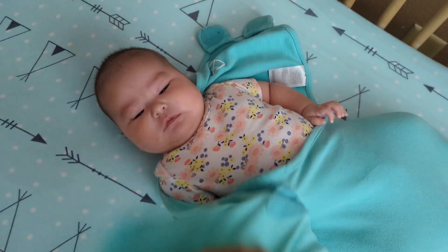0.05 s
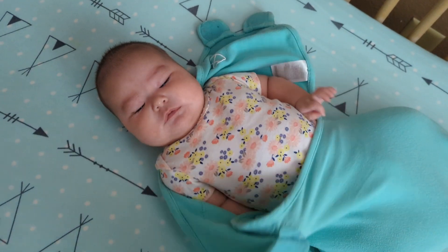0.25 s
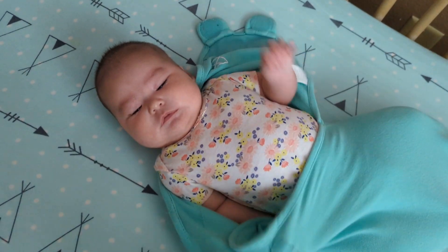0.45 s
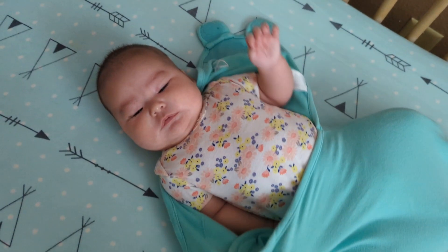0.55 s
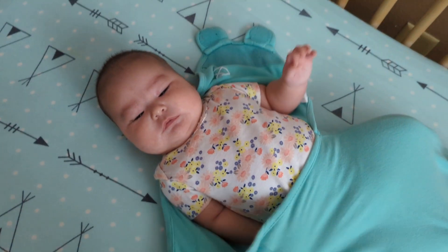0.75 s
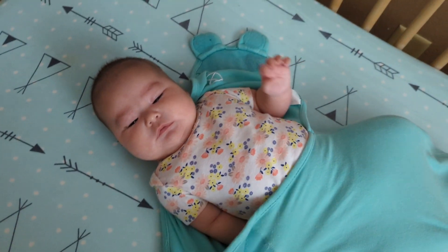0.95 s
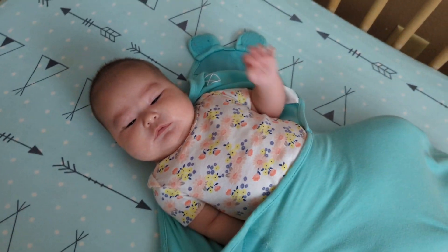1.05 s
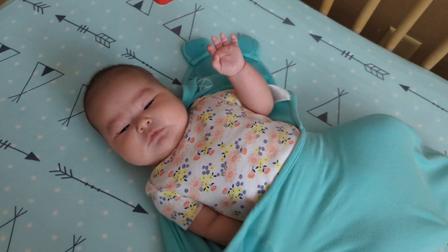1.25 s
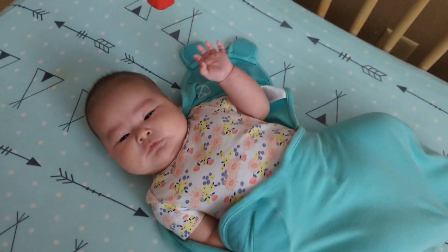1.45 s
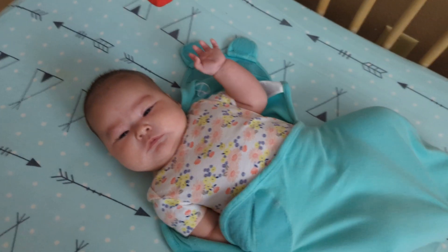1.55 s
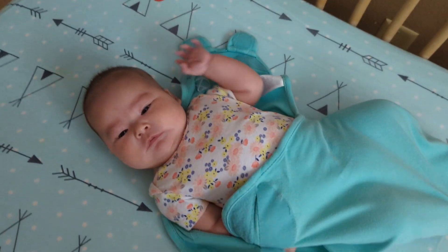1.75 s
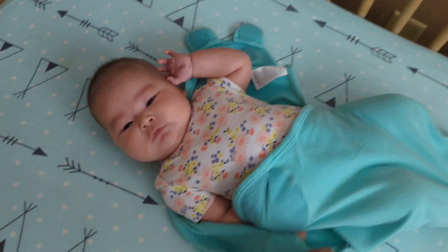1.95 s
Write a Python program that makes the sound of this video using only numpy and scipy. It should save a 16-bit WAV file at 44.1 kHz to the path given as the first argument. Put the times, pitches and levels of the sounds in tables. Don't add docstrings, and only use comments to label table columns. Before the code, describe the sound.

Crackling tear of a hook-and-loop fastener on soft cloth, ending with a short tug and wooden knock

```python
import sys
import numpy as np
from scipy import signal
from scipy.fft import rfft, irfft
from scipy.io import wavfile
from scipy.ndimage import uniform_filter1d

SR = 44100
rng = np.random.default_rng(int(sys.argv[2]) if len(sys.argv) > 2 else 0)


def unload_audio(sound):
    columns = np.transpose(np.atleast_2d(sound))
    steps = np.round(np.clip(columns, -1, 1) * 32767)
    wavfile.write(sys.argv[1], SR, steps.astype(np.int16))


def makeup_ratio(level_db):
    decades = np.asarray(level_db, float) / 20
    return 10 ** decades


N = 88200

# (time [s], hook level [dB], cloth level against hooks [dB])
FIRST_TUGS = [(0.0406, -20.5, -6), (0.0436, -16, -13), (0.0492, -36, -7.5), (0.0661, -19.5, -10.5),
              (0.0785, -34.5, 3), (0.0868, -24, -6), (0.0891, -27, -3), (0.0927, -22, -8.0),
              (0.0968, -28.5, -6), (0.1001, -28, 0.5), (0.1183, -43, 0), (0.1538, -42, -9.0),
              (0.1565, -29.5, -0.5), (0.1591, -33, -2.5), (0.1624, -32.5, -4), (0.1808, -40, -0.5),
              (0.1887, -21.5, -10.5), (0.1934, -32, -8.5), (0.1961, -24, -26), (0.2049, -40, 4),
              (0.2109, -38.5, -2.5), (0.2166, -28, -6.5), (0.219, -20, -9.5), (0.2247, -22.5, -4),
              (0.2285, -21.5, -9.5), (0.2619, -26, -4.5), (0.265, -36.5, -14.5), (0.284, -31, -9.5),
              (0.294, -24, -6.5), (0.3358, -27, -13.5)]
MIDDLE_RIP = [(0.3551, -26, -9.5), (0.358, -18, -9.0), (0.3622, -17.5, -11.5), (0.367, -23.5, -14),
              (0.3744, -21.5, -9.5), (0.3794, -24, -4.5), (0.3852, -24.0, -14.5), (0.3884, -16.5, -14.5),
              (0.3943, -23, -11.5), (0.3983, -21.5, -13.0), (0.4018, -13.5, -8.5), (0.412, -18, -13.5),
              (0.4172, -23, -13.5), (0.4211, -22.5, -8.5), (0.4245, -10, -14.5), (0.4302, -16.5, -13),
              (0.4326, -16, -12), (0.4362, -24.5, -10.5), (0.4393, -21.5, -13), (0.4448, -19, -13.5),
              (0.4504, -14, -11.5), (0.4552, -21, -14), (0.4636, -29.5, -13), (0.4732, -23, -18),
              (0.4788, -12, -14), (0.4827, -24, -13.5), (0.4878, -20.5, -12), (0.4993, -17.5, -10),
              (0.5024, -24, -10.5), (0.5109, -23, -11), (0.5138, -20, -9.5), (0.5173, -25.0, -14.0),
              (0.5217, -24.0, -21), (0.5266, -23.5, -18), (0.534, -24.5, -9.5), (0.5471, -29, -23),
              (0.5995, -24, -9), (0.6044, -24, -9.5), (0.6397, -26.5, -19.0), (0.6452, -27, -16.5),
              (0.6592, -31.5, -12.5), (0.664, -16.5, -4.5), (0.6678, -20, -13.5), (0.6722, -22, -14),
              (0.6772, -16, -19), (0.6806, -18, -12.5), (0.6899, -30.5, -12), (0.6941, -29, -8)]
LONG_RIP = [(0.713, -11, -13.5), (0.7225, -17, -17.5), (0.7252, -20, -10), (0.7289, -21, -12.5),
            (0.7319, -17, -13.0), (0.7345, -12.5, -12), (0.7405, -18, -11), (0.7448, -18, -17),
            (0.7519, -13.5, -10.5), (0.7591, -11.5, -12.5), (0.7652, -15, -10.5), (0.7703, -15.5, -8.5),
            (0.7745, -20.5, -14), (0.7788, -20, -14.0), (0.7827, -14.5, -13.5), (0.7853, -21, -12),
            (0.7878, -16.5, -8), (0.7917, -16.5, -17), (0.7941, -18.5, -12), (0.7966, -18.5, -14),
            (0.8025, -19.5, -12), (0.8069, -19, -15.5), (0.8116, -18, -19.5), (0.814, -22.0, -15),
            (0.8227, -20.5, -6), (0.8259, -12, -13), (0.8285, -16.5, -16.5), (0.8311, -20.0, -14),
            (0.8353, -14.5, -17), (0.8391, -23, -16), (0.8444, -20.5, -20), (0.8489, -19, -13),
            (0.8516, -22, -11), (0.8577, -22.5, -16.5), (0.8608, -21.5, -18.5), (0.8661, -26.5, -12.5),
            (0.871, -19.5, -14.5), (0.8758, -16.5, -14.5), (0.8848, -12, -11.5), (0.8939, -12, -12),
            (0.9006, -22, -12), (0.9083, -22.5, -13.5), (0.9129, -14, -7), (0.9166, -17.5, -8.5),
            (0.9303, -26.5, -12.5), (0.9357, -23.5, -13.5), (0.9402, -26, -8), (0.9498, -15.5, -9.5),
            (0.955, -28, -11.0), (0.9578, -25, -7)]
LAST_TUG = [(1.2903, -19.5, -7), (1.2953, -34.5, -12), (1.2998, -16, -18.5), (1.3081, -13, -15),
            (1.3206, -30.5, -13.5), (1.326, -40.5, -8), (1.3299, -41, -4), (1.3326, -33.5, -5),
            (1.3401, -25.5, -15), (1.3427, -38, -4.5), (1.3475, -29, -12), (1.3527, -42, -1)]
STRAY_ROWS = [(0.039, -22.5, -14), (.707, -35, -11), (.8825, -12, -11), (.921, -21.5, -9),
              (1.001, -42, -9.5), (1.2978, -21, -7), (1.313, -24.5, -5.5)]
# (time [s], level [dB])
PEEL = [(.347, -67), (.356, -30.5), (.46, -37), (.535, -40), (.56, -73), (.645, -62.5), (.66, -29),
        (.7, -45.5), (.712, -27.5), (.9, -32), (.955, -38), (.975, -65), (1.28, -77), (1.3, -31),
        (1.345, -50), (1.5, -62), (1.6, -84)]
# (time [s], middle band level [dB], top band level [dB])
HOOK_THINNING = [(0, -10, -5.5), (.3, 0.5, 1), (.4, 2.5, 3.5), (0.698, 0, 2), (.82, 4, -0.5),
                 (1.299, 0.5, -4)]
HOOK_BAND_EDGES = [8000, 12500]
# (frequency [Hz], width [Hz], level [dB])
HOOK_PEAKS = [(5565, 1370, 8), (9885, 1200, 8.5), (14760, 2260, 10.5)]
# (frequency [Hz], level [dB])
HOOK_TONE = [(300, -17.5), (1500, -11), (3200, -5.5), (8000, -4), (17000, -8)]
# (frequency [Hz], level [dB])
CLOTH_TONE = [(50, -37.5), (95, -12.5), (220, -14.5), (450, -11.5), (950, -10), (1150, -2.5), (2400, -2.5),
              (3600, -17.5)]
# (frequency [Hz], width [Hz], level [dB])
MATTRESS_PEAKS = [(122, 40, 7), (356.3, 54, 6.5), (1320, 150, 2.5)]
BODY_BAND = [150, 900]
# (frequency [Hz], correlation [0 to 1])
LIKENESS = [(60, 0.98), (400, 0.96), (560, 0.62), (1410, 0.54), (3100, 0.35), (6800, 0.33), (15000, 0.18)]
# (frequency [Hz], left minus right level [dB])
LEAN = [(60, 0.5), (700, -0.3), (1300, 5), (4000, 2)]
# (time [s], level [dB])
SQUEAK = [(1.245, -80), (1.27, -64), (1.305, -52), (1.345, -56), (1.385, -60), (1.41, -80)]
# (time [s], length [s], level [dB])
RUSTLES = [(1.295, 0.022, -49.5), (1.633, 0.015, -55.5), (1.708, 0.0066, -53.5), (1.755, 0.016, -66),
           (1.809, 0.013, -67), (1.875, 0.024, -67), (1.959, 0.058, -67)]
# (frequency [Hz], level [dB])
RUSTLE_TONE = [(300, -12), (900, -10.5), (1400, 1), (2400, -3.5), (3500, -16), (16000, -46)]
# (frequency [Hz], level [dB], rise [s], ring [s])
WOOD_MODES = [(121, -9.5, 0.09, 0.089), (352.7, -8, 0.0069, 0.041), (571, -19, 0.022, 0.053),
              (650, -19.5, .01, 0.066), (1160, -12, 0.0042, 0.035), (1283, -2.5, 0.00055, 0.0069),
              (1755, -2, 0.00055, 0.0051), (2248, -11.5, 0.0025, 0.014)]
# (frequency [Hz], level [dB])
RATTLE_TONE = [(100, -14), (620, 0.5), (950, -9.5), (1200, -0.5), (2500, -4), (3400, -20.5), (7000, -41)]
# (frequency [Hz], level [dB])
RUMBLE_TONE = [(15, -15), (40, -1.5), (80, -1), (160, -47.5)]
# (frequency [Hz], level [dB per Hz])
FLOOR_TONE = [(30, -11.5), (100, 3), (450, -15.5), (1700, -8), (3500, -11.5), (16000, -23.5)]
# (frequency [Hz], time to fall 60 dB [s])
ROOM_T60 = [(110, 1), (300, 0.24), (1840, 0.39), (4850, 0.35), (12800, 0.19)]

FLAT = [(1, 0), (SR, 0)]
TIME = np.arange(N) / SR
KNOCK_S, KNOCK_DB = 1.3882, -16


def evened(x):
    return x / np.sqrt(np.mean(x ** 2) + 1e-20)


def read(points, hz):
    f, value = np.transpose(points)
    return np.interp(np.log(hz + 1), np.log(f + 1), value)


def wander(shape, size):
    noise = rng.standard_normal(shape)
    return evened(uniform_filter1d(uniform_filter1d(noise, size=size), size=size))


def pair(x, tone, peaks=()):
    hz = np.fft.rfftfreq(N, 1 / SR)
    resonance = sum(db * np.exp(-((hz - f) / width) ** 2) for f, width, db in peaks)
    a, b = rfft(x) * evened(makeup_ratio(read(tone, hz) + resonance))
    same = np.clip(read(LIKENESS, hz), 0, 1)
    lean = makeup_ratio(read(LEAN, hz) / 2)
    left = a * lean
    right = (same * a + np.sqrt(1 - same ** 2) * b) / lean
    return irfft(np.array([left, right]))[:, :N]


def quiet_floor():
    return makeup_ratio(-74.5) * pair(rng.standard_normal((2, N)), FLOOR_TONE)


def bumps(times, dbs, rise, fall):
    t = np.arange(0, N, 5) / SR
    u = t - np.asarray(times)[:, None]
    shape = np.exp(-2 * np.where(u < 0, (u / rise) ** 2, u / fall))
    power = makeup_ratio(np.asarray(dbs))[:, None] ** 2 * shape
    return np.interp(TIME, t, power.sum(0))


def hook_snaps(power):
    hooks_per_s, spread_db, patchy_db = 16000, 2.5, 2.5
    sizes = makeup_ratio(spread_db * np.minimum(rng.exponential(1, N), 4))
    sizes = sizes * (rng.random(N) < hooks_per_s / SR)
    sizes = sizes / np.sqrt(abs(uniform_filter1d(sizes ** 2, size=50)) + 1e-9)
    signs = rng.choice([-1., 1.], (2, N))
    hooks = pair(np.sqrt(power) * sizes * signs, HOOK_TONE, HOOK_PEAKS)

    above, top = (signal.sosfiltfilt(signal.butter(4, hz, "high", fs=SR, output="sos"), hooks)
                  for hz in HOOK_BAND_EDGES)
    patch = patchy_db * wander((3, N), 150)
    patch = patch - patch.mean(0)
    at, middle_db, top_db = np.transpose(HOOK_THINNING)
    low_part = (hooks - above) * makeup_ratio(patch[0])
    middle_part = (above - top) * makeup_ratio(np.interp(TIME, at, middle_db) + patch[1])
    top_part = top * makeup_ratio(np.interp(TIME, at, top_db) + patch[2])
    return low_part + middle_part + top_part


def cloth_shake(power):
    slack_until_s, slack_body_db, taut_body_db = .345, -8.5, 3
    cloth = pair(np.sqrt(power) * rng.standard_normal((2, N)), CLOTH_TONE, MATTRESS_PEAKS)
    body = signal.sosfiltfilt(signal.butter(2, BODY_BAND, "band", fs=SR, output="sos"), cloth)
    body_gain = makeup_ratio(np.where(TIME < slack_until_s, slack_body_db, taut_body_db))
    return cloth + body * (body_gain - 1)


def strap():
    row_rise_s, row_fall_s, cloth_fall_s, long_row_stretch = .0008, .0009, .0014, 1.5
    peel_cloth_db, peel_flicker_db = -7.5, 3
    events = list(FIRST_TUGS) + list(MIDDLE_RIP) + list(LONG_RIP) + list(LAST_TUG) + list(STRAY_ROWS)
    s, db, cloth_db = np.transpose(events)
    in_long_rip = (s >= LONG_RIP[0][0]) & (s <= LONG_RIP[-1][0])
    stretch = np.where(in_long_rip, long_row_stretch, 1)[:, None]
    peel = makeup_ratio(np.interp(TIME, *np.transpose(PEEL)) + peel_flicker_db * wander(N, 60)) ** 2
    rows = bumps(s, db, row_rise_s * stretch, row_fall_s * stretch)
    shakes = bumps(s, db + cloth_db, row_rise_s * stretch, cloth_fall_s * stretch)
    return hook_snaps(rows + peel) + cloth_shake(shakes + peel * makeup_ratio(2 * peel_cloth_db))


def room(x):
    room_db, near_db, near_t60 = -13.5, -7.5, 0.033
    length = SR // 2
    taps = np.zeros((2, 2, length))
    at = np.arange(40, length - 20, 20) + rng.integers(0, 20, (2, 2, (length - 41) // 20))
    np.put_along_axis(taps, at, rng.choice([-1., 1.], at.shape), 2)

    hz, t, z = signal.stft(taps[0], SR, nperseg=256)
    decay = makeup_ratio(-60 * t / read(ROOM_T60, hz)[:, None]) * (t > .008)
    tail = signal.istft(z * decay, SR, nperseg=256)[1][:, :length]
    near = taps[1] * makeup_ratio(-60 * np.arange(length) / SR / near_t60)
    both = makeup_ratio(room_db) * tail / np.linalg.norm(tail[0]) + makeup_ratio(near_db) * near / np.linalg.norm(near[0])
    return pair(signal.fftconvolve(x.mean(0)[None], both, axes=1)[:, :N], FLAT)


def squeak():
    hz, width_hz = 2040, 130
    line = pair(rng.standard_normal((2, N)), FLAT, [(hz, width_hz * 3, 60)])
    return makeup_ratio(np.interp(TIME, *np.transpose(SQUEAK), left=-120, right=-120)) * line


def rustle():
    brush_s, brush_length_s, brush_db = 1.897, 0.037, -66.5
    level = sum(makeup_ratio(db) * np.exp(-((TIME - s) / length) ** 2) for s, length, db in RUSTLES)
    grain = makeup_ratio(2.5 * evened(uniform_filter1d(rng.standard_normal(N), size=150)))
    brush = makeup_ratio(brush_db) * np.exp(-((TIME - brush_s) / brush_length_s * 2) ** 4)
    a, b = rng.standard_normal((2, 2, N))
    return pair(level * grain * a, RUSTLE_TONE) + pair(brush * b, HOOK_TONE, HOOK_PEAKS)


def wood_ring():
    ring_shape, sag_per_s = 3, 0.21
    t = np.maximum(TIME - KNOCK_S, 0)
    out = np.zeros((2, N))
    for k, (hz, db, rise, ring) in enumerate(WOOD_MODES):
        lag = np.arccos(np.clip(read(LIKENESS, hz), 0, 1)) * np.array([[0], [(-1) ** k]])
        envelope = (1 - np.exp(-t / rise)) * np.exp(-(t / ring) ** ring_shape)
        out += makeup_ratio(db) * envelope * np.sin(2 * np.pi * hz * t * (1 - sag_per_s * t) + lag)
    return makeup_ratio(KNOCK_DB) * out


def rattle():
    t = np.maximum(TIME - KNOCK_S, 0)
    struck = t > 0
    level = makeup_ratio(-11 - 60 * t / 0.11) + makeup_ratio(-19 - 60 * t / 0.54)
    noise = rng.standard_normal((2, N))
    return makeup_ratio(KNOCK_DB) * struck * pair(level * struck * noise, RATTLE_TONE)


def rumble():
    at_s, length_s, level_db = 1.56, .16, -57
    sway = np.exp(-((TIME - at_s) / length_s) ** 4)
    return makeup_ratio(level_db) * sway * evened(pair(rng.standard_normal((2, N)), RUMBLE_TONE))


def scene():
    dry = strap() + squeak() + rustle() + rattle()
    return quiet_floor() + dry + room(dry) + wood_ring() + rumble()


def band_limit(x):
    return signal.sosfilt(signal.butter(12, 16980, fs=SR, output="sos"), x)


def record(dry):
    peak, bass_cut_hz, edge_hz = .6, 45, 15850
    mix = signal.sosfilt(signal.butter(2, bass_cut_hz, "high", fs=SR, output="sos"), dry)
    mix = peak * np.tanh(mix / peak)
    low_pass = signal.firwin(511, edge_hz, window=("kaiser", 9), fs=SR)
    mix = signal.oaconvolve(mix, low_pass[None], "same")
    return band_limit(mix)


dry = scene()
out = record(dry)
unload_audio(out)
```